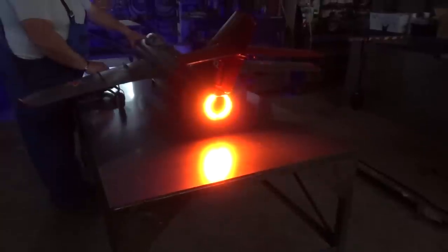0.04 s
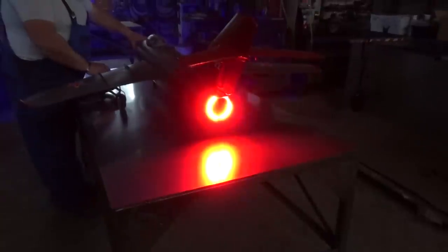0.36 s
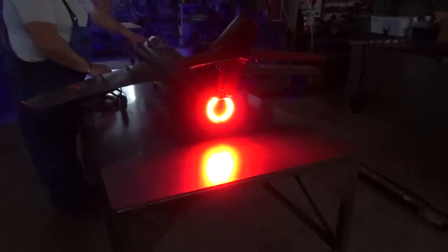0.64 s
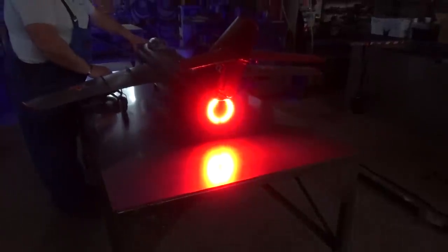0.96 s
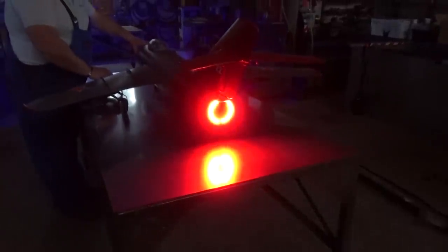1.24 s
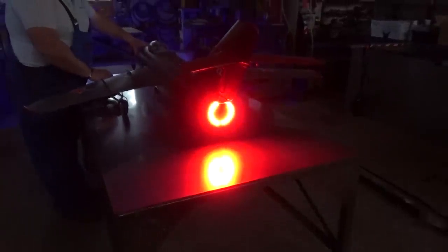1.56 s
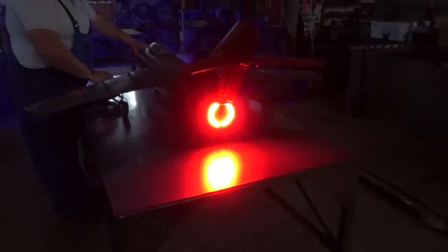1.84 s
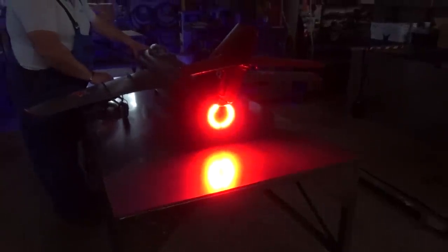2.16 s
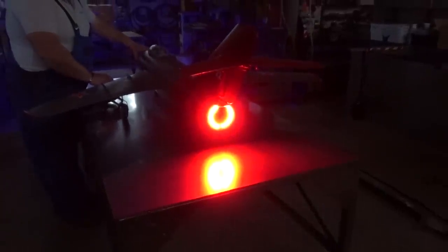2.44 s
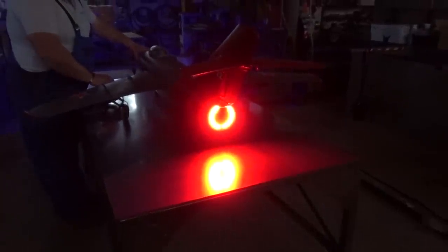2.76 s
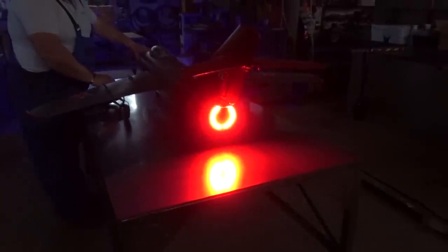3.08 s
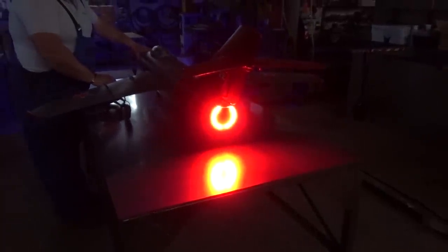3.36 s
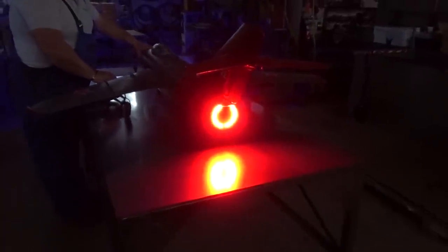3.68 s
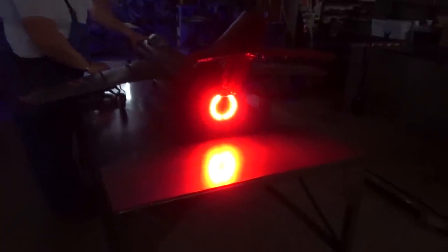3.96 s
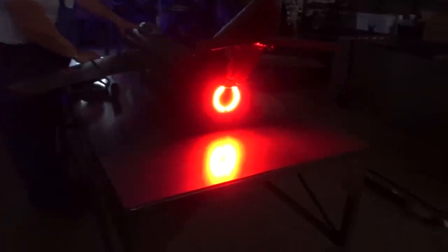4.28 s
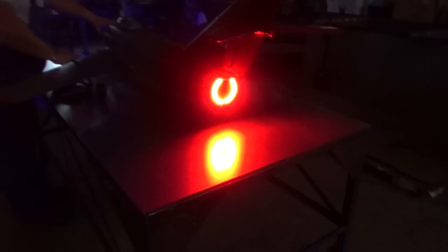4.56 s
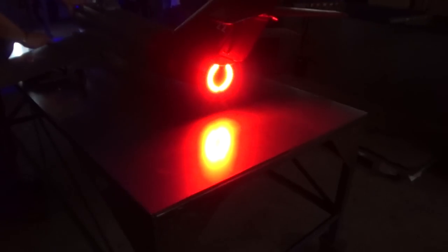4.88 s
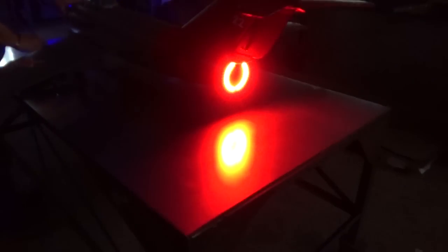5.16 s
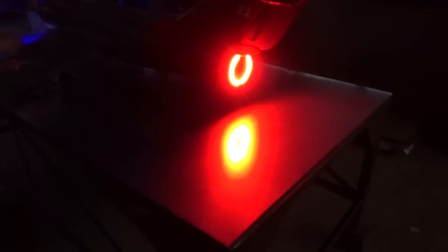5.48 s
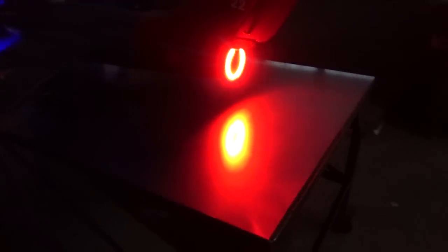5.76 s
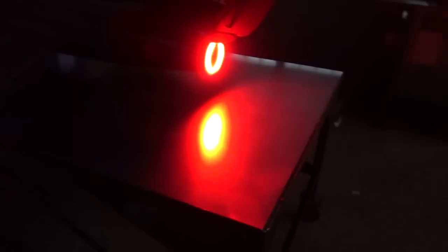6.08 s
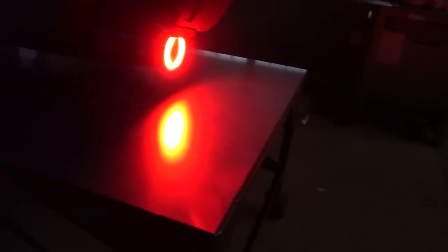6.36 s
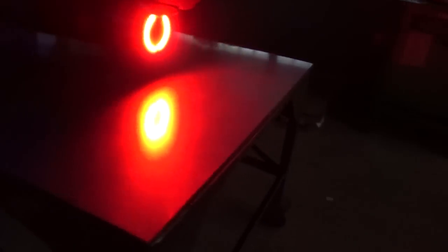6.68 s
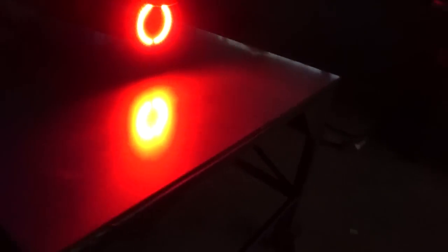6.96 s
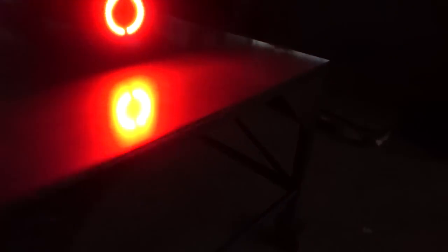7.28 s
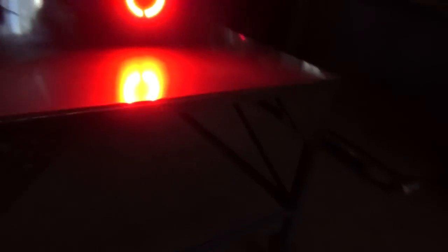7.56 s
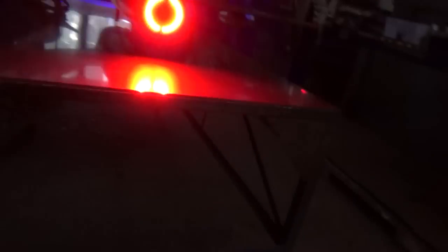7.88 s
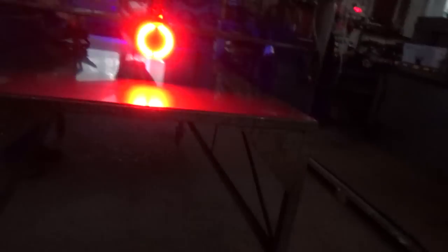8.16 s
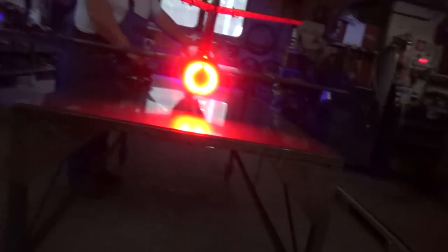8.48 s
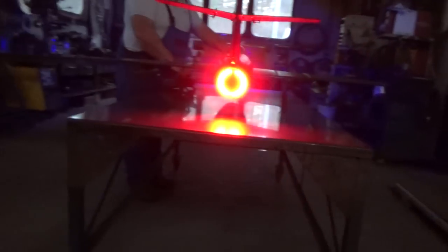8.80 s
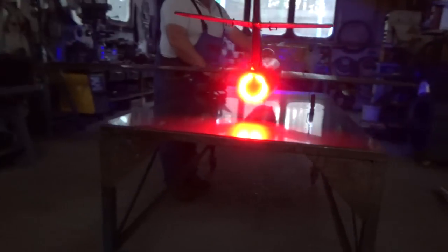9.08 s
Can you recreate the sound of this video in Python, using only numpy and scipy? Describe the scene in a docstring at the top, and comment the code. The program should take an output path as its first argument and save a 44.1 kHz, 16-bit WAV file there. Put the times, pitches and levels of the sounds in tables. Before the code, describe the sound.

A model jet's electric ducted fan runs on a workshop bench, a high whine over a lower hum and a strong hiss of air. Its pitch climbs in small steps for about five seconds, then holds. The hiss shifts in tone as the microphone moves round the tail. Near the end the exhaust hits the microphone with loud rumbling and crackling, pushing the fan sound down.

```python
"""A high whine over a hum and rushing air, climbing in steps: a model jet's fan is throttled up.
It sits in its duct on a steel workshop bench. The shaft hums once per turn, the seven blades
whine on every seventh multiple of that pitch, and air rushes from the nozzle.
Near the end the microphone is carried round the tail into the exhaust: the jet buffets it,
and the automatic gain control turns the fan down along with everything else."""
import sys
import numpy as np
from scipy import signal
from scipy.fft import rfft, irfft
from scipy.io import wavfile
from scipy.ndimage import uniform_filter1d

SR = 44100
rng = np.random.default_rng(int(sys.argv[2]) if len(sys.argv) > 2 else 0)


def materialize(psi):
    """Save the field psi as 16-bit PCM at rate SR to the path in sys.argv[1].

    A 1-D psi becomes a single channel; in a 2-D psi each row is a channel.
    """
    bounded = np.clip(np.atleast_2d(psi).T, -1, 1)
    quanta = np.round(bounded * 32767).astype(np.int16)
    wavfile.write(sys.argv[1], SR, quanta)


N = 411450
TIME = np.arange(N) / SR
FREQS = np.maximum(np.fft.rfftfreq(N, 1 / SR), 1)
LEFT_RIGHT = np.array([[1], [-1]])   # a "side" signal is added on the left, subtracted on the right

# Throttle steps. In most, the hum glides through a dead spot of the room and dips briefly:
# t/s, speed rise/Hz, glide/s, dip delay/s, dip depth/dB
THROTTLE_STEPS = [(.079, 3.05, .085, .05, 7), (.685, 18.29, .13, .06, 10), (1.643, 5.22, .053, 0, 0),
                  (1.845, 12.61, .074, .025, 11), (2.478, 6.3, .063, 0, 0), (2.647, 15.88, .037, .04, 12),
                  (2.842, 3.64, .189, 0, 0), (3.482, 7.22, .035, .06, 10), (3.816, 17.26, .067, .04, 10),
                  (4.389, 7.47, .056, .11, 11), (4.859, 13.81, .073, 0, 0)]

def shaft_speed(start_hz=367.88, sag_from_s=5.086, sag_hz_per_s=2.0):
    """Turns per second: a smooth rise at each throttle step, then a slow sag as the battery tires."""
    steps = sum(rise_hz * .5 * (1 + np.tanh((TIME - t) / glide_s))
                for t, rise_hz, glide_s, _, _ in THROTTLE_STEPS)
    return start_hz + steps - sag_hz_per_s * np.maximum(TIME - sag_from_s, 0)

# The lowest tone of the whine: t/s, level/dB
WHINE_LEVEL = [(0.0, -21.5), (0.7, -24.5), (1.1, -42), (1.5, -34), (1.7, -26.5), (1.9, -26), (4.9, -25.5),
               (5.3, -42), (5.7, -24.5), (5.9, -41), (6.1, -34.1), (6.5, -28.5), (7.0, -29.5), (7.1, -40),
               (7.5, -19), (7.7, -27.5), (8.8, -20.5), (9.33, -19)]
# The tone an octave above it: t/s, level/dB
WHINE_OCTAVE = [(0.0, -25.5), (0.3, -24.5), (0.8, -30.5), (1.5, -34), (1.9, -19.5), (2.3, -17.5),
                (3.1, -23.5), (5.2, -16), (5.5, -19), (6.3, -22.5), (7.2, -17), (7.4, -31.3), (7.7, -22.5),
                (8.0, -27.5), (9.0, -30.1), (9.33, -25)]
# Higher tones take their loudness from their pitch: f/Hz, level/dB
WHINE_OVERTONES = [(7700, -26.5), (8400, -25.5), (9050, -32), (9600, -25.5), (10000, -35), (11000, -57),
                   (12200, -52), (13300, -44), (14200, -52), (15500, -59)]

def blade_whine(angle, speed, blades=7, load_db=1, full_load_hz_per_s=100, fade_db=2, flutter_db=1.44):
    """Each passing blade pushes the air; swirling inflow roughens the tones and the room scatters them."""
    swell_db = load_db * np.tanh(np.gradient(speed) * SR / full_load_hz_per_s)   # while speeding up
    levels_db = [in_time(WHINE_LEVEL)[0] + swell_db, in_time(WHINE_OCTAVE)[0]]
    for harmonic in (3, 4, 5):   # these swell and fade in the room's standing waves
        pitch_db = np.interp(harmonic * blades * speed, *np.transpose(WHINE_OVERTONES))
        levels_db.append(pitch_db + fade_db * drift(5))
    out = np.zeros((2, N))
    for k, level_db in enumerate(levels_db):
        phase = (k + 1) * blades * angle
        tone = np.sqrt(2) * np.sin(phase) * from_db(flutter_db * drift(5))
        tone += from_db(-17) * narrow_noise(phase, width_hz=28)
        tone += from_db(-19) * narrow_noise(phase, width_hz=170)
        side = from_db(-13 - 5 * k) * narrow_noise(phase, width_hz=5)
        out += from_db(level_db) * (tone + LEFT_RIGHT * side)
    return out

# The once-per-turn hum: t/s, centre level/dB, side level/dB
HUM_LEVEL = [(0.0, -27, -34), (0.5, -29.5, -42), (1.1, -22, -38), (2.0, -27.5, -40.4), (2.4, -36, -49.0),
             (2.6, -21, -41.6), (3.0, -27.5, -48), (3.2, -25.5, -39.0), (3.9, -27.5, -55),
             (4.1, -26, -45.9), (4.5, -31.5, -46.4), (4.9, -28, -48.2), (6.3, -23.5, -42),
             (6.7, -27.5, -47), (7.4, -45.5, -68), (7.7, -31.5, -52), (8.0, -24, -40), (9.33, -20, -33.6)]
# The tone an octave above it: t/s, level/dB
HUM_OCTAVE = [(0.0, -50), (0.3, -35), (1.2, -46.5), (2.4, -37.5), (3.1, -43.5), (3.3, -51), (3.6, -36.5),
              (5.3, -43.5), (6.2, -38.5), (7.3, -45), (8.2, -34), (9.33, -33)]

def shaft_hum(angle, dip_s=0.028, waver_db=0.6, octave_side_db=-8, flutter=0.088):
    """The slightly unbalanced rotor hums; the sound reaches left and right out of step."""
    centre_db, side_db = in_time(HUM_LEVEL)
    octave_db, = in_time(HUM_OCTAVE)
    dip_db = sum(depth_db * np.exp(-((TIME - t - delay_s) / dip_s) ** 2)
                 for t, _, _, delay_s, depth_db in THROTTLE_STEPS)
    centre = from_db(centre_db - dip_db + waver_db * drift(6.7)) * np.sin(angle)
    side = LEFT_RIGHT * from_db(side_db) * np.cos(angle)
    octave = np.sin(2 * angle) + LEFT_RIGHT * from_db(octave_side_db) * np.cos(2 * angle)
    return np.sqrt(2) * (centre + side + from_db(octave_db) * octave) * (1 + flutter * drift(45))

# Exhaust wind on the microphone, from the jet's edge through its core and out: t/s, level/dB
WIND_LEVEL = [(7.45, -71), (7.94, -44), (7.975, -8.5), (8.06, -21), (8.135, -9.5), (8.165, -1), (8.5, 1.5),
              (8.7, 2.5), (9.02, 5), (9.13, -12.5), (9.33, -22)]
# Single hard gusts: t/s, rumble level/dB, crackle level/dB
WIND_GUSTS = [(7.97, -22.5, -34), (8.154, 0, -23), (8.281, -18, -11), (8.362, -6, -17), (8.403, -6, -19),
              (8.428, -18, -7), (8.442, -22, 1), (8.521, -1, -6), (8.54, -12, 3), (8.58, -3, -13),
              (8.628, -6, -8), (8.894, -2, -5), (9.031, -11, -6.5), (9.103, 1, -28), (9.204, -6.5, -29)]
# The wind's tone, heavy in the bass: f/Hz, relative level/dB
WIND_COLOUR = [(20, -17), (55, 2), (120, 1), (250, -2), (500, -7.5), (1000, -19), (2000, -28), (4000, -36),
               (10000, -45)]
# Its stereo width: f/Hz, side against centre/dB
WIND_WIDTH = [(50, -10), (110, -11.5), (200, -5), (380, 0.5), (700, -4), (1300, 1), (3000, -2)]

def buffeting(onset_s=0.5, lump_db=0.44, gust_s=0.0031, tear_db=3.5, split_hz=550):
    """Swirls of exhaust hit the microphone and rumble, tear and crackle. Returns sound and strength."""
    wind_db, = in_time(WIND_LEVEL)
    arrival = np.clip((TIME - WIND_LEVEL[0][0]) / onset_s, 0, 1)
    strength = arrival * from_db(wind_db + lump_db * drift(45))
    crackle_gain = 0
    for t, rumble_db, crackle_db in WIND_GUSTS:
        puff = np.exp(-.5 * ((TIME - t) / gust_s) ** 2)
        strength += from_db(rumble_db) * puff
        crackle_gain += from_db(crackle_db) * puff
    spectrum = air_spectrum(WIND_COLOUR, WIND_WIDTH)
    rumble = band(spectrum, 24, split_hz)
    brightness = (strength / from_db(-1)) ** 0.19   # stronger wind sounds brighter
    tearing = band(spectrum, split_hz, 9700) * brightness * from_db(tear_db * drift(130))
    crackle = rms_one(band(spectrum, 750, 11000) * from_db(tear_db * drift(380)))
    return strength * (rumble + tearing) / np.std(rumble) + crackle_gain * crackle, strength

# Pitches that duct and bench boost or weaken in the rushing air: f/Hz, width/Hz, gain/dB
DUCT_PEAKS = [(764, 55, -4.5), (1500, 280, 2), (2000, 900, 1), (3760, 110, 2.5)]

def duct_gain():
    """The airway shapes the noise with rounded peaks and hollows."""
    return from_db(sum(db * np.exp(-(2 * (FREQS - hz) / width) ** 2) for hz, width, db in DUCT_PEAKS))

# Rushing air in six bands: t/s, then level/dB of rumble, low roar, high roar, duct noise, hiss, top hiss
AIR_LEVELS = [(0.0, -39.5, -34, -33, -28, -24, -22.5), (4.5, -42.3, -35.5, -37.5, -27, -23.5, -22),
              (5.1, -41.5, -36, -38.5, -26.5, -22.5, -23.5), (6.6, -42, -35, -38, -27, -25, -25),
              (6.7, -44.5, -37.5, -43, -28, -24, -26.5), (7.3, -44, -35, -39.5, -28, -24.5, -24.0),
              (8.0, -43, -28.5, -30, -29.5, -24.5, -26.5), (8.2, -40, -26.5, -27.5, -26.2, -25, -27.5),
              (9.33, -38, -20.5, -23.5, -22, -20, -23)]
# The borders of those bands: f/Hz
AIR_EDGES = [20, 700, 1500, 2600, 5000, 8500, 17000]
# The air's tone, before each band gets its own loudness: f/Hz, relative level/dB
AIR_COLOUR = [(40, -27.5), (100, -21), (230, -17.5), (480, -9), (1100, -7.5), (1850, -9), (3200, 3.5),
              (4700, -2), (6500, 2.5), (7900, 0), (9800, 5), (11200, -1), (12500, -8), (15800, -18)]
# Its stereo width: f/Hz, side against centre/dB
AIR_WIDTH = [(50, -27), (110, -23), (250, -19), (700, -15.5), (1400, -11.5), (2400, -13.5), (4400, -34),
             (6800, -33), (10000, -60), (15000, -47)]

def air_rush(surge_db=0.5, flicker_db=0.5):
    """The jet of air roars and hisses; the balance shifts with the angle to the nozzle."""
    spectrum = air_spectrum(AIR_COLOUR, AIR_WIDTH) * duct_gain()
    shared_db = surge_db * drift(27)
    out = np.zeros((2, N))
    for level_db, low_hz, high_hz in zip(in_time(AIR_LEVELS), AIR_EDGES, AIR_EDGES[1:]):
        noise = rms_one(band(spectrum, low_hz, high_hz))
        out += noise * from_db(level_db + shared_db + flicker_db * drift(44))
    return out

# The band of hiss that bounces off the bench top: t/s, middle f/Hz, relative level/dB
BENCH_BAND = [(4.9, 3906, -50), (5.4, 3490, -33), (5.8, 3180, -35), (6.3, 3005, -35), (6.6, 3084, -36),
              (6.85, 3666, -34), (7.2, 3950, -35), (7.6, 4220, -33), (7.95, 4440, -74)]

def bench_reflection(half_width_hz=420):
    """The bounce off the bench strengthens a band of hiss that slides as the microphone moves."""
    hz, level_db = in_time(BENCH_BAND)
    phase = 2 * np.pi * np.cumsum(hz) / SR
    lowpass = signal.butter(4, half_width_hz, fs=SR, output="sos")
    noise = signal.sosfilt(lowpass, rng.standard_normal((2, N)))
    return from_db(level_db) * rms_one(noise[0] * np.cos(phase) + noise[1] * np.sin(phase))

# Faint extra tones: multiple of the shaft speed, relative level/dB
FAINT_TONES = [(3, -22), (4, -24), (5, -17.5), (6, -21), (8, -10.5), (13, -18), (15, -16), (20, -12.5),
               (22, -29)]

def uneven_blades(angle, wander_db=3, side_db=-11):
    """Slightly unequal blades add weak tones that fade in and out."""
    out = np.zeros((2, N))
    for multiple, level_db in FAINT_TONES:
        phase = multiple * angle + rng.uniform(0, 2 * np.pi)
        tone = np.sin(phase) + LEFT_RIGHT * from_db(side_db) * np.cos(phase)
        out += from_db(level_db + wander_db * drift(2.3)) * tone
    return out * from_db(in_time(AIR_LEVELS)[3])   # they follow the duct noise band

def from_db(db):
    """Decibels to gain."""
    return 10 ** (np.asarray(db) / 20)

def rms_one(x):
    """Scale a signal to an average power of 1."""
    return x / np.sqrt(np.mean(np.abs(x) ** 2) + 1e-20)

def in_time(rows):
    """Join a table's points in time: one curve for each column after the first."""
    times, *columns = np.transpose(rows)
    return [np.interp(TIME, times, column) for column in columns]

def gain_by_hz(points):
    """Turn rows of f/Hz, level/dB into a gain for every frequency."""
    hz, db = np.transpose(points)
    return from_db(np.interp(np.log(FREQS), np.log(hz), db))

def drift(rate):
    """A smooth random wobble of typical size 1, changing about `rate` times a second."""
    pole = np.exp(-40 * np.pi * rate / SR)
    noise = rng.standard_normal(N // 20 + 4002)   # one value per 20 samples, plus time to settle
    slow = signal.lfilter([1], [1, -2 * pole, pole * pole], noise)[4000:]
    return np.interp(np.arange(N) / 20, np.arange(len(slow)), rms_one(slow))

def narrow_noise(phase, width_hz):
    """A thin band of noise that follows a tone's pitch."""
    return drift(width_hz) * np.cos(phase) + drift(width_hz) * np.sin(phase)

def air_spectrum(colour, width):
    """Left and right spectra of air noise with a given tone and stereo width."""
    centre, side = rfft(rng.standard_normal((2, N)))
    return gain_by_hz(colour) * (centre + LEFT_RIGHT * side * gain_by_hz(width))

def band(spectrum, low_hz, high_hz):
    """The sound of one soft-edged slice of a spectrum."""
    return irfft(spectrum / ((1 + (low_hz / FREQS) ** 16) * (1 + (FREQS / high_hz) ** 16)), N)

def scene(whine_flutter_db=6, air_flutter_db=3.2):
    """Mix the fan and its rushing air, with wind on the microphone at the end."""
    speed = shaft_speed()
    angle = 2 * np.pi * np.cumsum(speed * (1 + 0.000313 * drift(13.1))) / SR
    wind, strength = buffeting()
    flutter = np.tanh(strength / 0.66) * drift(14)   # sound crossing the swirling exhaust flutters
    whine = from_db(0.25 + whine_flutter_db * flutter) * blade_whine(angle, speed)
    hum = from_db(0.4) * shaft_hum(angle) + from_db(3.0) * uneven_blades(angle)
    air = from_db(-0.13) * air_rush() + from_db(4.0) * bench_reflection()
    air *= from_db(air_flutter_db * flutter)
    return (whine + hum + air) * from_db(0.05 * LEFT_RIGHT) + from_db(-0.3) * wind

def record(dry, input_db=0.96, ceiling_db=-14.0, window_s=0.006, attack_s=0.0015, release_db_per_s=27):
    """The gain control turns loud sound down fast and recovers slowly; the highest treble is cut."""
    boosted = from_db(input_db) * dry
    power = uniform_filter1d(np.mean(boosted ** 2, axis=0), size=int(window_s * SR) + 1)
    over_db = np.maximum(10 * np.log10(np.abs(power) + 1e-12) - ceiling_db, 0)
    recovery_db = release_db_per_s * TIME
    held_db = np.maximum.accumulate(over_db + recovery_db) - recovery_db
    smoothing = np.exp(-1 / (attack_s * SR))
    cut_db = signal.lfilter([1 - smoothing], [1, -smoothing], held_db)
    limited = np.clip(boosted * from_db(-cut_db), -1, 1)
    treble_cut = signal.ellip(12, .1, 90, 15750, fs=SR, output="sos")
    return signal.sosfilt(treble_cut, limited)


dry = scene()
out = record(dry)
materialize(out)
```